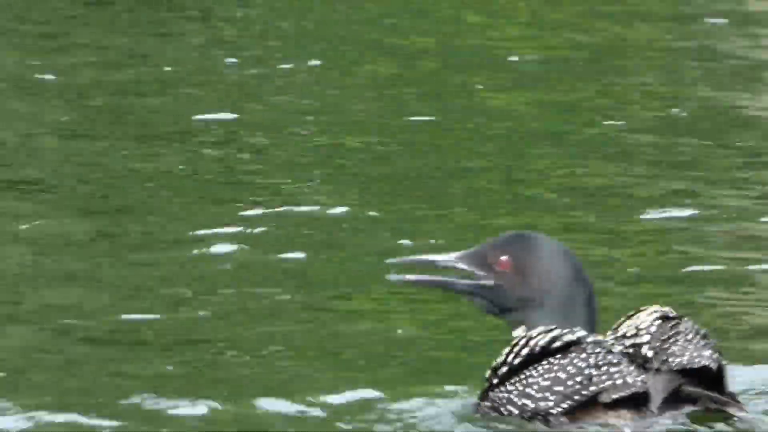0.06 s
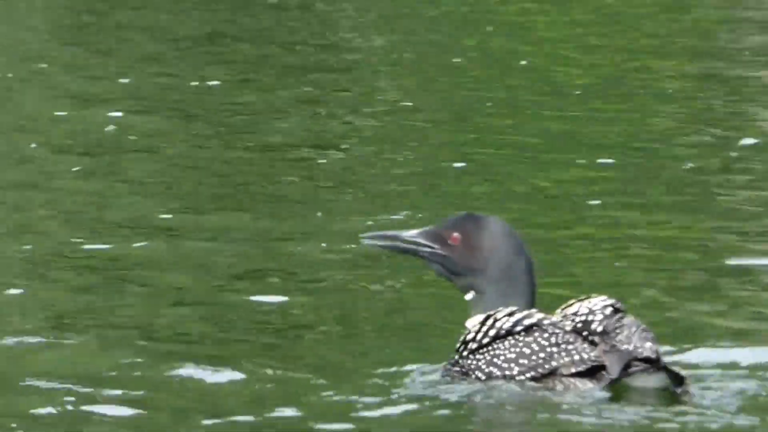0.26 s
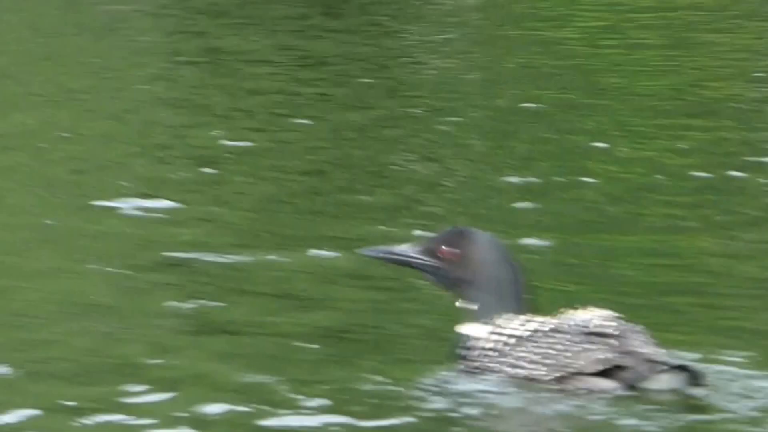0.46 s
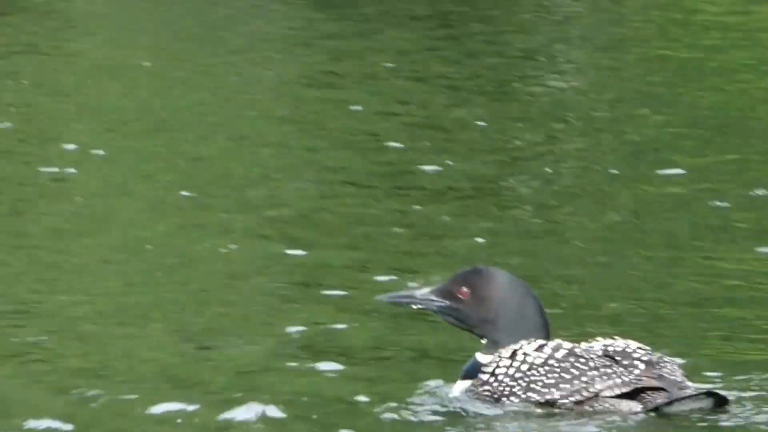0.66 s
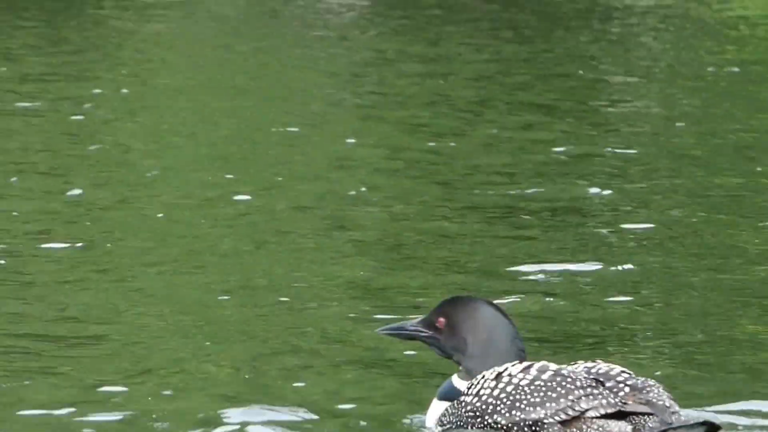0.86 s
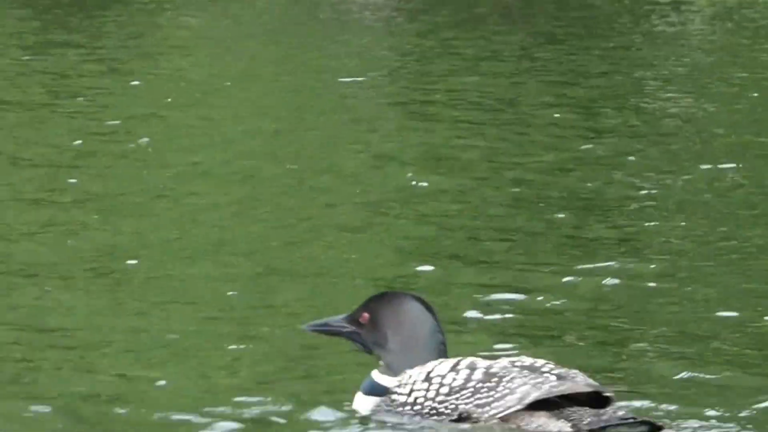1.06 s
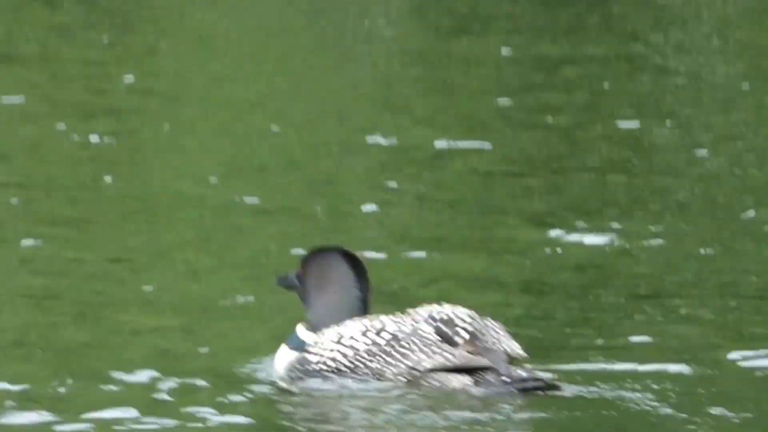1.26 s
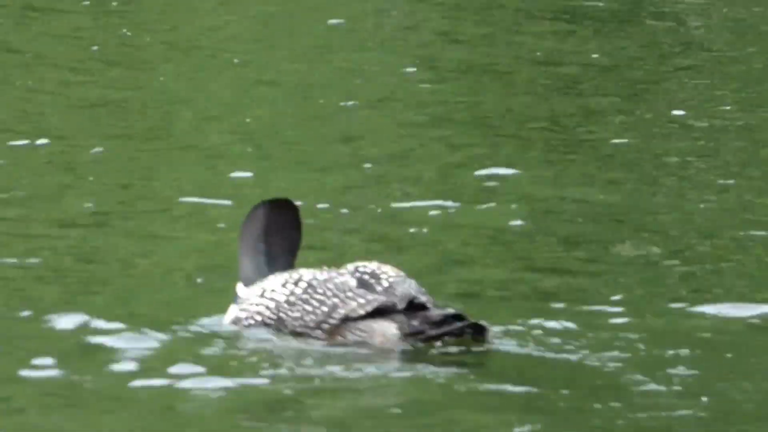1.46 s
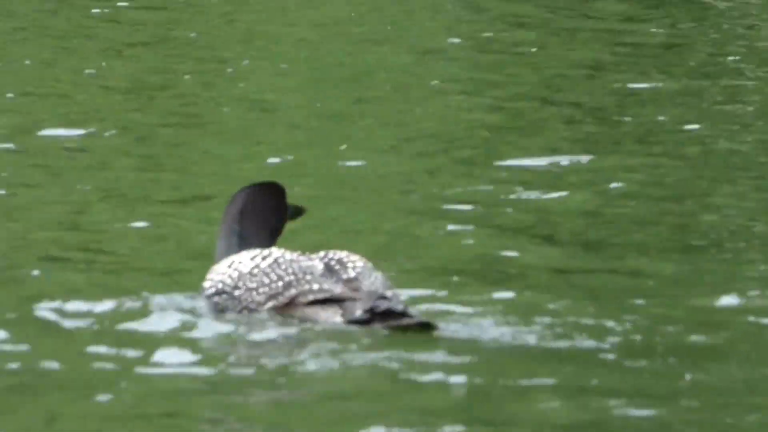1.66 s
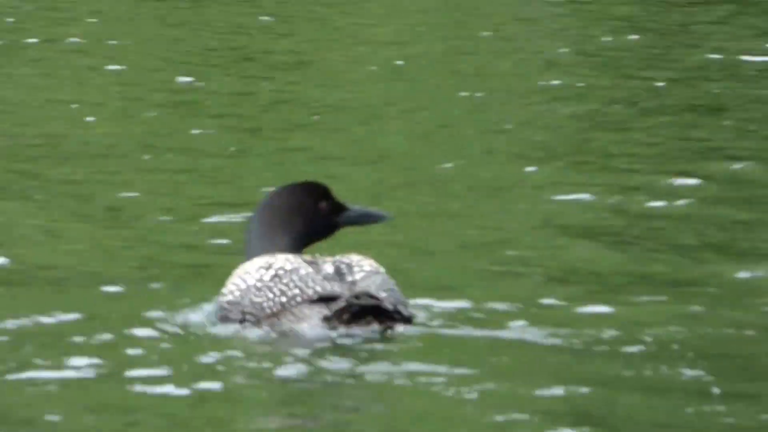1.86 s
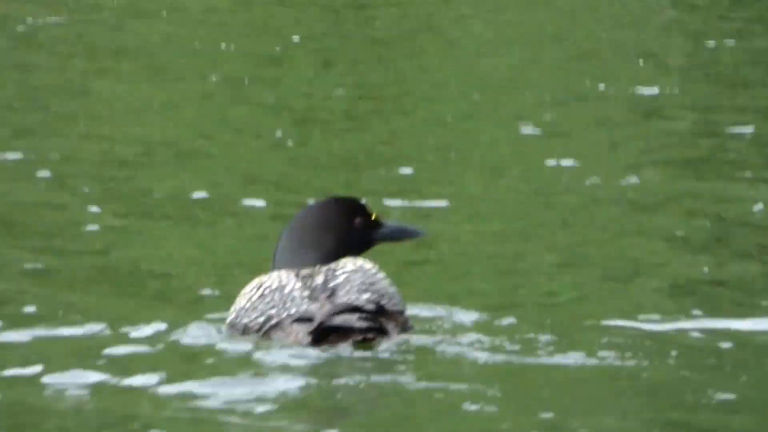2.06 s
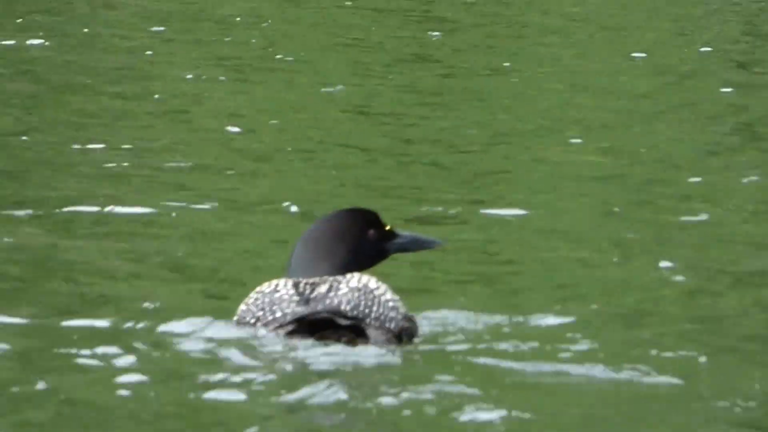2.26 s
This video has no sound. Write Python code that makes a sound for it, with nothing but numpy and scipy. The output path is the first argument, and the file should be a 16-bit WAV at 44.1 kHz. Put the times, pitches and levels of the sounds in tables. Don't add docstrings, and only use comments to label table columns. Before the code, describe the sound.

A loon close by gives one rapid four-beat quavering call, echoing faintly off a wooded shore; a camera motor's whir stops as it ends, leaving small drips, plops, low rumble and microphone hiss.

```python
import sys
import numpy as np
from scipy import signal
from scipy.fft import rfft, irfft, next_fast_len
from scipy.io import wavfile
from scipy.ndimage import uniform_filter1d, map_coordinates

SR = 44100
rng = np.random.default_rng(int(sys.argv[2]) if len(sys.argv) > 2 else 0)


def store_wav(level_fs):
    pcm = np.round(np.clip(np.atleast_2d(level_fs), -1, 1) * 32767)
    wavfile.write(sys.argv[1], SR, pcm.T.astype(np.int16))


def ratio_of_db(decibels):
    return 10 ** (np.asarray(decibels, float) / 20)


N = 101429


def unit(x):
    return x / np.sqrt(np.mean(x ** 2) + 1e-20)


def along(points, hz):
    f, v = np.transpose(points)
    return np.interp(np.log(hz + 1), np.log(f + 1), v)


def over_time(points):
    return np.interp(np.arange(N) / SR, *np.transpose(points))


def eased(rows):
    s, *cols = np.transpose(rows)
    place = np.interp(np.arange(N) / SR, s, np.arange(len(s)))
    place = np.floor(place) + 0.5 - 0.5 * np.cos(np.pi * (place % 1))
    return [np.interp(place, np.arange(len(s)), c) for c in cols]


def wobble(rate):
    knots = rng.standard_normal(400)
    return map_coordinates(knots, [np.clip(np.arange(N) * rate / SR, 0, 398)])


def filtered(x, response):
    m = next_fast_len(N + SR // 2)
    hz = np.fft.rfftfreq(m, 1 / SR)
    return irfft(rfft(x, m) * response(hz), m)[..., :N]


def panned(db):
    return ratio_of_db(np.array([db / 2, -db / 2]))


def humps(table, hz):
    return sum(ratio_of_db(db) / (1 + (2 * (hz - c) / w) ** 2) for c, w, db in table)


def rush(gain, alike, patchy_db):
    z = signal.stft(rng.standard_normal((2, N)), nperseg=512)[2]
    field = uniform_filter1d(rng.standard_normal(z.shape[1:]), size=5, axis=0)
    field = uniform_filter1d(field, size=9, axis=1)
    pair = signal.istft(z * ratio_of_db(patchy_db * unit(field)), nperseg=512)[1][:, :N]

    def mid_and_side(hz):
        turn = np.arccos(np.clip(alike(hz), -1, 1)) / 2
        return gain(hz) * [np.cos(turn), np.sin(turn)]

    mid, side = filtered(pair, mid_and_side)
    return unit(np.array([mid + side, mid - side]))


def background():
    # (f/Hz, level/dB per Hz)
    rumble_colour = [(15, -48.5), (25, -27), (152, -2.5), (351, -1), (379, -12), (414, -2), (520, -14),
                     (680, -59), (1140, -120)]
    lapping_colour = [(280, -20), (480, -7), (795, -6.5), (1390, -19.5), (2500, -28.5), (3250, -43),
                      (5500, -120)]
    hiss_colour = [(880, -43), (1500, -37), (1860, -7.5), (3310, -9), (4950, -3.5), (6190, -5.5),
                   (12400, -12), (15500, -12.5)]
    # (t/s, level/dB)
    rumble_course = [(0.0, -57), (0.88, -58), (1.07, -57), (1.62, -59), (2.0, -56), (2.3, -59)]
    lapping_course = [(0, -59.5), (.6, -63), (1.05, -54), (1.35, -61.5), (1.9, -57.5), (2.3, -60)]
    # (f/Hz, width/Hz, level/dB)
    hums = [
        (95, 20, -81.5),
        (146, 18.6, -75.5),
        (372.7, 6.9, -75),
        (785.5, 20.4, -80),
    ]
    # (f/Hz, likeness)
    likeness = [(60, 0.78), (180, 1), (550, 0.72), (1650, 0.041), (4970, 0.49), (15000, 0.39)]
    # (f/Hz, left-right/dB)
    lean = [(60, -3.5), (180, 1), (550, -5), (1650, 1), (4970, -2), (15000, 0.5)]

    def alike(hz):
        return along(likeness, hz)

    def hiss_alike(hz):
        return along([(3000, 0.47), (14000, 0.44)], hz)

    rumble_db = over_time(rumble_course) + 0.12 * wobble(21.0)
    rumble = ratio_of_db(rumble_db + 1.5) * rush(lambda hz: ratio_of_db(along(rumble_colour, hz)), alike, patchy_db=-1.55)
    lapping_db = over_time(lapping_course) + wobble(21.17)
    lapping = ratio_of_db(lapping_db - 0.24) * rush(lambda hz: ratio_of_db(along(lapping_colour, hz)), alike, patchy_db=3.0)
    drones = ratio_of_db(-61.5) * rush(lambda hz: humps(hums, hz), alike, patchy_db=4.5)
    hiss = ratio_of_db(-69) * rush(lambda hz: ratio_of_db(along(hiss_colour, hz)), hiss_alike, patchy_db=-1.0)
    return filtered(rumble + lapping + drones, lambda hz: panned(along(lean, hz))) + hiss


def zoom_motor():
    # (f/Hz, level/dB per Hz)
    whir_colour = [(1060, 2), (1800, -3), (2380, -6.5), (3180, -18), (4850, -7), (8720, -6), (15500, -20.5)]
    # (f/Hz, width/Hz, level/dB)
    housing = [
        (2420, 90, 7),
        (4850, 500, 5),
        (8750, 450, 4),
        (12500, 600, 3),
        (14300, 500, 6),
    ]
    level_db, stop_s, stop_fade_s = -60, 0.56, 0.0078
    step_rate, step_db = 60.5, 4.5
    t = np.arange(N) / SR
    steps = ratio_of_db(step_db * np.cos(np.pi * step_rate * t) ** 8)

    def through_housing(hz):
        return ratio_of_db(along(whir_colour, hz)) * (1 + humps(housing, hz))

    whir = rush(through_housing, lambda hz: 0.56 + 0 * hz, patchy_db=0.5)
    return ratio_of_db(level_db) * unit(steps * whir) * np.clip((stop_s - t) / stop_fade_s, 0, 1)


def bubble(hz, rise, t60, attack):
    t = np.arange(SR // 5) / SR
    ring = np.sin(2 * np.pi * hz * (t + rise * t * t / t60))
    return ring * ratio_of_db(-60 * t / t60) * (1 - np.exp(-t / attack))


def droplet_tick(hz):
    t60_s, snap = 0.005, 4.5
    t = np.arange(SR // 20) / SR
    band = signal.butter(2, [0.78 * hz, min(1.7 * hz, 0.45 * SR)], "bandpass", fs=SR)
    burst = rng.standard_normal((2, len(t))) + 1.7 * rng.standard_normal(len(t))
    burst = burst + snap * (t == 0)
    return signal.lfilter(*band, burst * ratio_of_db(-60 * t / t60_s))


def water():
    # (t/s, peak/dB, f/Hz, left-right/dB)
    drips = [(0.832, -54.5, 7060, -9), (0.9887, -61.5, 4930, -3), (1.0152, -56.5, 4690, -4),
             (1.055, -63.5, 1770, -4), (1.2284, -58.5, 6800, 6), (1.2406, -63.5, 2020, -2),
             (1.5704, -57.5, 4650, -3), (1.571, -51, 4040, -5), (1.58, -65, 4500, -3),
             (1.146, -64, 4100, 3), (1.7786, -68, 4090, 3), (1.6437, -70, 1830, 12),
             (1.6918, -58, 3970, -5), (1.8016, -55, 3910, 7), (1.8074, -62, 4000, 0.5),
             (1.822, -65, 1920, 10), (2.087, -65, 5460, -9), (2.1513, -60, 8900, -2),
             (2.2417, -61.5, 1930, 7)]
    # (t/s, peak/dB, f/Hz, left-right/dB)
    ticks = [(0.83, -55, 7200, -17), (0.9298, -59.5, 7100, 17), (0.938, -55, 6140, 7),
             (0.9783, -49, 4930, 4), (1.121, -57, 10700, 11), (1.1294, -64, 7090, -0.5),
             (1.148, -50, 6400, -2), (1.3544, -64, 5280, 0.5), (1.569, -52.5, 5330, -3.0),
             (1.723, -54, 9740, 4), (1.7847, -53.5, 6460, 2), (1.8018, -51, 5170, 6),
             (2.0177, -46.5, 5840, 4), (2.087, -49, 5300, -2), (2.129, -55, 6850, -1.5),
             (2.1575, -43.5, 5580, -8), (2.1625, -52.5, 5200, -4), (1.779, -56, 5000, 3),
             (1.0145, -50, 5200, -2), (1.228, -59, 6500, 2), (2.2448, -56, 7300, -4)]
    # (t/s, f/Hz, rise/share, t60/s, level/dB)
    plops = [(.035, 513, 0.032, 0.12, -36.5), (0.956, 630, 0.022, 0.041, -33.5),
             (1.8015, 580, 0.02, 0.03, -25), (1.802, 1110, 0.067, 0.024, -34.5),
             (1.812, 553, 0.041, 0.1, -24), (.6, 800, .03, .04, -38), (1.299, 630, .03, 0.028, -39.5),
             (1.533, 760, 0.052, 0.046, -34.5), (1.635, 870, 0.024, 0.025, -36),
             (1.94, 800, 0.032, 0.087, -39), (1.995, 1960, 0.4, 0.029, -44.5),
             (2.006, 3130, 0.88, 0.022, -47), (2.243, 1100, 0.64, 0.017, -37.5),
             (2.242, 625, 0.084, 0.02, -32.5), (1.15, 950, 0.096, 0.043, -40.5),
             (1.036, 750, .03, 0.066, -37)]
    drip_cycles, ripple_cycles = 33.6, 3.4
    ripple_rate, ripple_db = 53, -61
    sounds = []
    for s, db, hz, pan in drips:
        sounds.append((s, db + 7, pan, bubble(hz, 0.02, 2 * drip_cycles / hz, 0.0002)))
    for a, b, c, d in rng.random((300, 4))[:int(ripple_rate * N / SR)]:
        hz = 1000 * ratio_of_db(19.4 * c)
        ripple = bubble(hz, 0.12, 2 * ripple_cycles / hz, 0.00019)
        sounds.append((a * N / SR, ripple_db + 8 * b, 8 * (d - 0.5), ripple))
    for s, hz, rise, t60, db in plops:
        sounds.append((s, db, -2.5, bubble(hz, rise, t60, 0.014 * t60 / 0.065)))
    for s, db, hz, pan in ticks:
        sounds.append((s, db - 5, pan, droplet_tick(hz)))
    out = np.zeros((2, N + SR))
    for s, db, pan, wave in sounds:
        out[:, round(s * SR):][:, :wave.shape[-1]] += ratio_of_db(db) * panned(pan)[:, None] * wave
    return out[:, :N]


def loon():
    # (t/s, f/Hz)
    tremolo = [
        (.155, 610),
        (.218, 714),
        (.258, 642),
        (.301, 740),
        (.358, 625),
        (.397, 703),
        (.454, 597),
        (.495, 617),
        (.557, 537),
    ]
    # (t/s, squeeze: 0 loose, 1 tight, below 0 limp)
    throat = [
        (.174, -.5),
        (.216, .95),
        (.262, .09),
        (.296, .92),
        (.356, .2),
        (.404, .97),
        (.458, .05),
        (.494, .97),
        (.64, -1.7),
    ]
    # (t/s, opening/dB, gape: 0 narrow, more is wider)
    bill = [(.22, -7.5, -.15), (.245, 4, .75), (.296, -8.5, -.15), (.336, 2.5, .5), (.359, -3.5, .75),
            (.425, 2, .35), (.458, -26, 2.3), (.494, 0, 1.3), (.563, -50, .7)]
    # (t/s, level/dB)
    effort = [(.195, -35), (.226, -24), (.257, -20.5), (.281, -22), (.31, -17.5), (.375, -23),
              (.436, -20.5), (.466, -24), (.508, -22.5)]
    # (multiple, slack level/dB, gain when squeezed/dB)
    overtones = [
        (2, -22.5, 16),
        (3, -47, 22.5),
        (4, -49, 5.5),
    ]
    # (f/Hz, width/Hz, level/dB)
    windpipe = [(2044, 252, 0)]
    # (f/Hz, width/Hz, narrow-bill level/dB, gain as it gapes/dB)
    mouth = [(2993, 164, -17, 3), (3673, 320, -38, 8), (4155, 505, -27, 3), (4708, 201, -40, 13),
             (5490, 439, -26, -26), (7400, 1300, -37, -30), (10700, 2400, -56, -3)]
    # (f/Hz, width/Hz, level/dB)
    breath_colour = [(900, 1500, -1), (4100, 2300, 4), (10520, 3200, -1)]
    voice_s, fade_s = 0.186, 0.017
    gulp_s, gulp_len_s, gulp_hz, gulp_db = 0.175, 0.018, 650, -35.5
    slack_hz = 665
    sag_db_per_s2 = 7502
    jitter, shimmer, fray, breath_db = 0.0012, 0.016, 0.045, -44

    t = np.arange(N) / SR
    (pitch,), (squeeze,) = eased(tremolo), eased(throat)
    open_db, gape = eased(bill)
    level_db = over_time(effort) - sag_db_per_s2 * np.clip(t - effort[-1][0], 0, 1) ** 2
    level = ratio_of_db(uniform_filter1d(level_db, size=600))
    pitch = pitch * (1 + jitter * wobble(82.3))
    phase = 2 * np.pi * np.cumsum(pitch) / SR

    voice = np.cos(phase)
    for k, db, gain_db in overtones:
        carried = humps(windpipe, k * pitch) if k == 3 else 1
        voice = voice + ratio_of_db(db + gain_db * squeeze) * carried * np.cos(k * phase)
    tract = [(hz, width, db + gain_db * gape) for hz, width, db, gain_db in mouth]
    for k in range(5, 19):
        flicker = ratio_of_db((0.6 + 0.45 * (k - 1)) * wobble(90))
        frayed = k * phase + rng.uniform(0, 6) + fray * max(k - 3, 0.5) * wobble(500)
        voice = voice + ratio_of_db(open_db) * humps(tract, k * pitch) * flicker * np.cos(frayed)

    air = unit(filtered(rng.standard_normal(N), lambda hz: humps(breath_colour, hz)))
    voice = voice * (1 + shimmer * (wobble(90) + wobble(640))) + ratio_of_db(breath_db + open_db / 4) * air
    gate = np.clip((t - voice_s) / fade_s + 0.5, 0, 1)
    gulp_shape = np.sin(np.pi * np.clip((t - gulp_s) / gulp_len_s, 0, 1))
    gulp = ratio_of_db(gulp_db) * gulp_shape * np.cos(phase * gulp_hz / slack_hz)
    return np.sqrt(2) * (level * gate * voice + gulp)


def shore(x):
    # (f/Hz, t60/s)
    tree_t60 = [(500, 3), (1500, 1.76), (4000, 0.58)]
    # (delay/s, level/dB)
    bank_echoes = [
        (.27, -35.5),
        (.295, -37.5),
        (.32, -38),
        (.35, -44),
        (.45, -46.5),
    ]
    near_db, near_t60_s = -17.5, 0.36
    trees_db, trees_s, trees_rise_s = -35, 0.29, 0.04
    trees_top_hz, bank_top_hz = 2210, 1700
    hz, t, z = signal.stft(rng.standard_normal((2, 2 * SR)), SR, nperseg=256)
    late = np.clip(t - trees_s, 0, None)
    near = ratio_of_db(near_db - 60 * t / near_t60_s)
    trees = ratio_of_db(trees_db - 60 * late / along(tree_t60, hz)[:, None]) * np.clip(late / trees_rise_s, 0, 1)
    dulling = 1 + (hz[:, None] / trees_top_hz) ** 4
    tail = signal.istft(z * (near + trees) / dulling, SR, nperseg=256)[1]
    tail = tail + 0.21 * tail[::-1]
    dull = filtered(x, lambda f: 1 / (1 + (f / bank_top_hz) ** 2))
    banks = sum(ratio_of_db(db) * np.pad(dull, (round(s * SR), 0))[:N] for s, db in bank_echoes)
    return signal.fftconvolve(x[None], tail / np.sqrt(SR / 10), axes=1)[:, :N] + banks


def scene():
    # (f/Hz, left-right/dB)
    call_lean = [(700, -0.8), (1400, 1.7), (3000, 6.5), (8000, 2.5)]
    surroundings = background() + zoom_motor() + water()
    call = loon()
    direct = filtered(call, lambda hz: panned(along(call_lean, hz)))
    return surroundings + direct + shore(call)


def roll_off(x):
    return signal.sosfilt(signal.butter(12, 15680, fs=SR, output="sos"), x)


def record(dry):
    top_hz = 15720
    mix = filtered(dry, lambda hz: hz < top_hz)
    return roll_off(mix)


dry = scene()
out = record(dry)
store_wav(out)
```